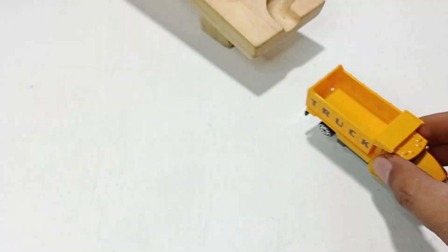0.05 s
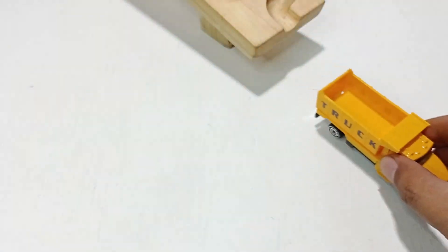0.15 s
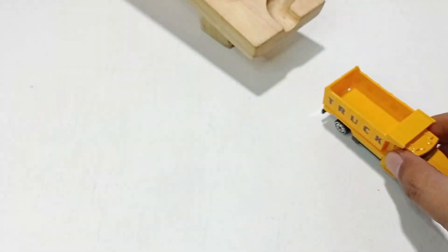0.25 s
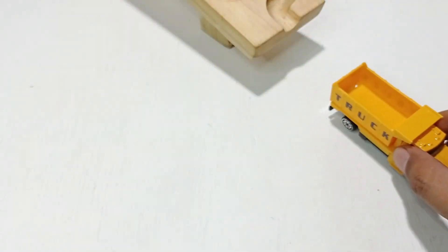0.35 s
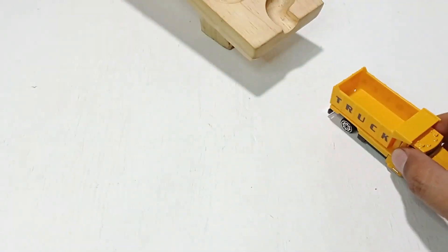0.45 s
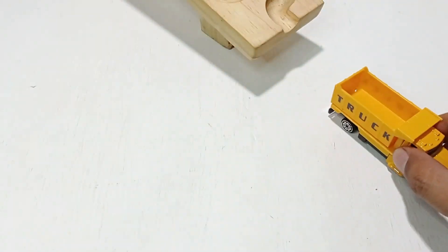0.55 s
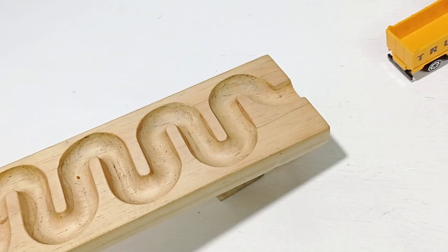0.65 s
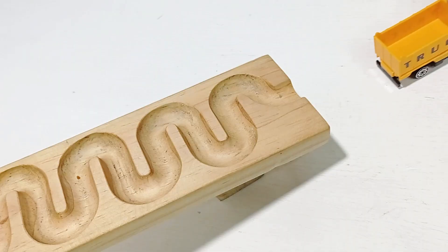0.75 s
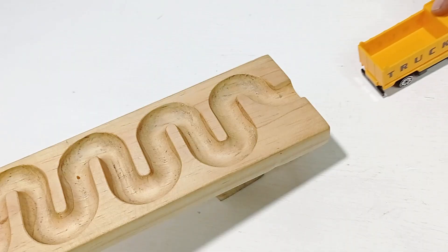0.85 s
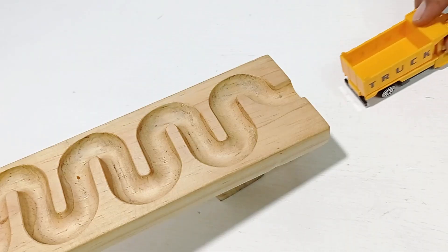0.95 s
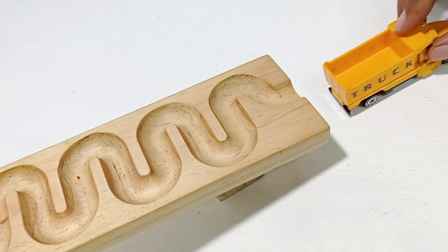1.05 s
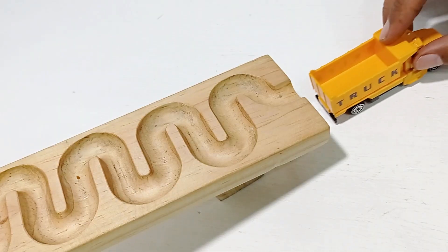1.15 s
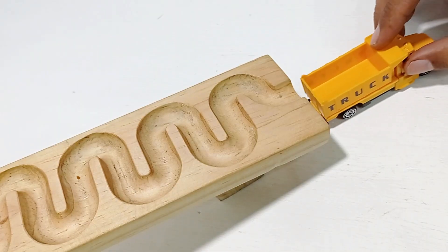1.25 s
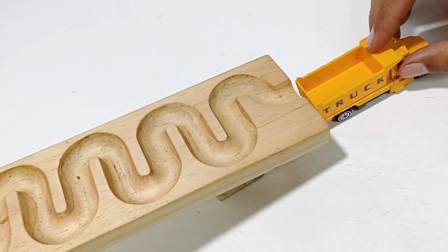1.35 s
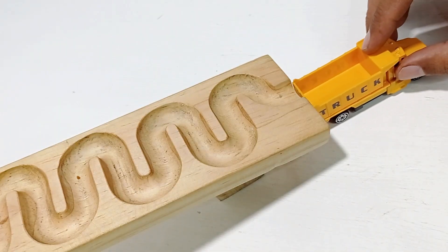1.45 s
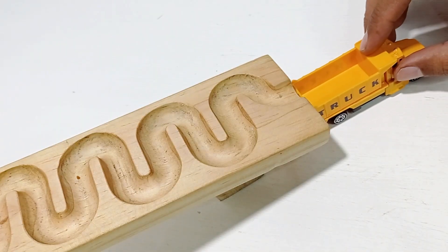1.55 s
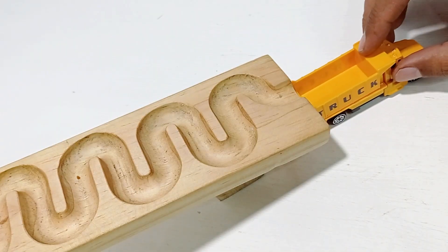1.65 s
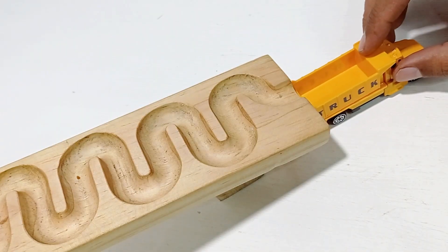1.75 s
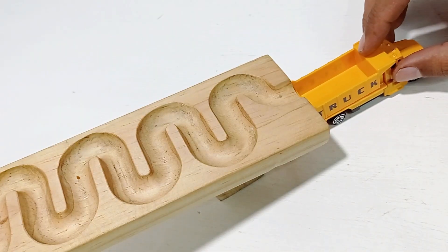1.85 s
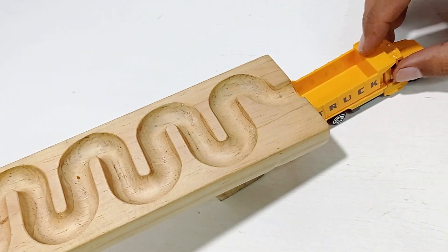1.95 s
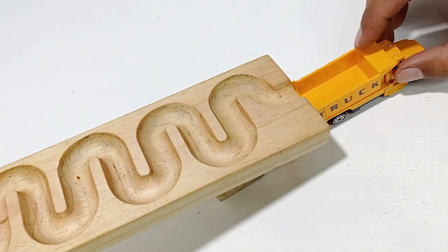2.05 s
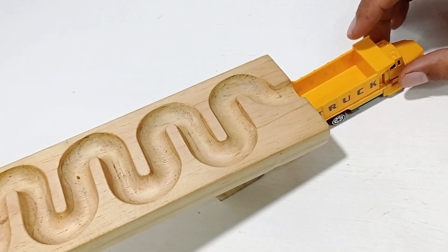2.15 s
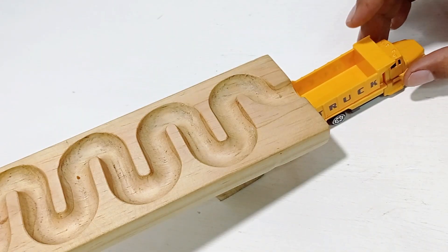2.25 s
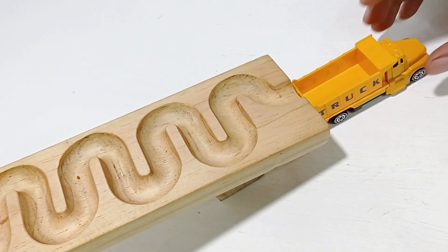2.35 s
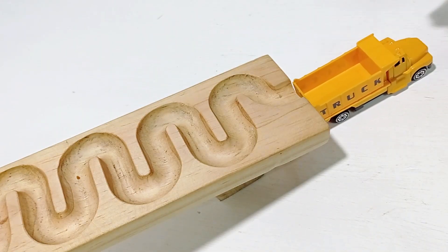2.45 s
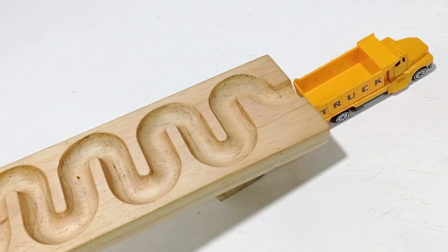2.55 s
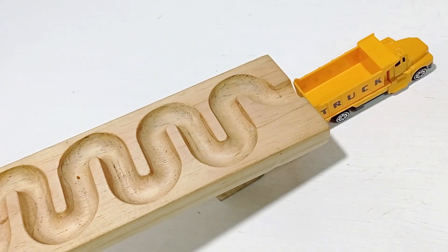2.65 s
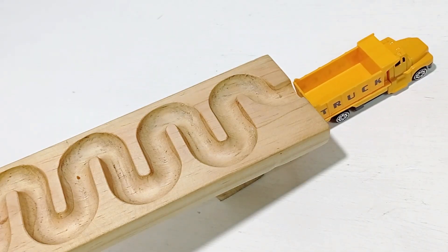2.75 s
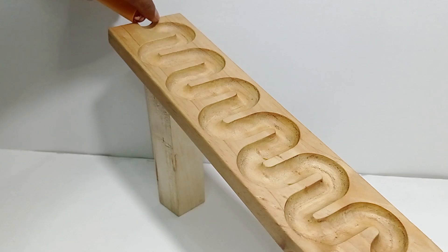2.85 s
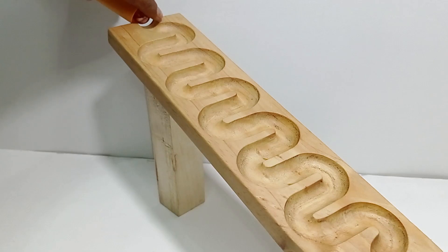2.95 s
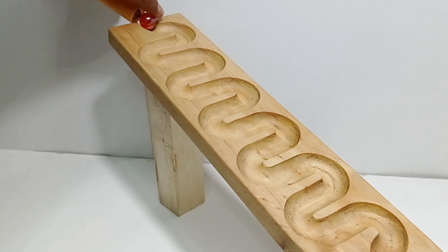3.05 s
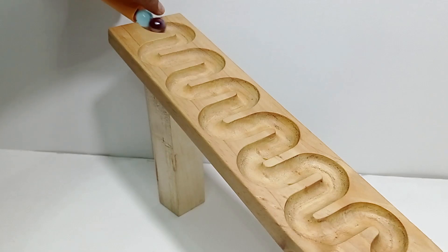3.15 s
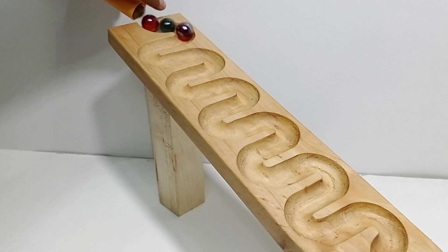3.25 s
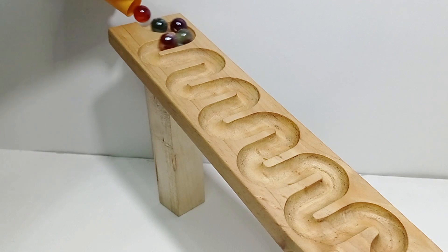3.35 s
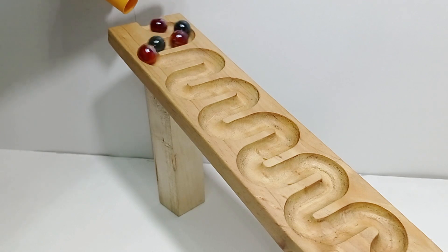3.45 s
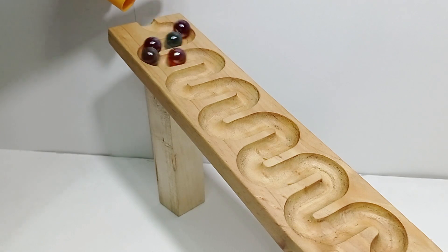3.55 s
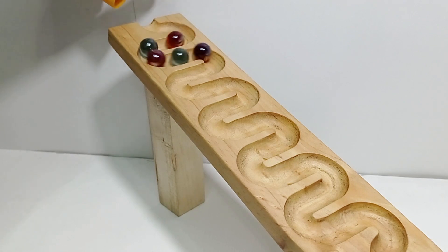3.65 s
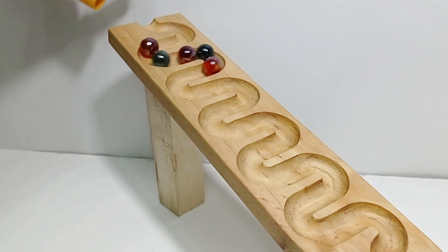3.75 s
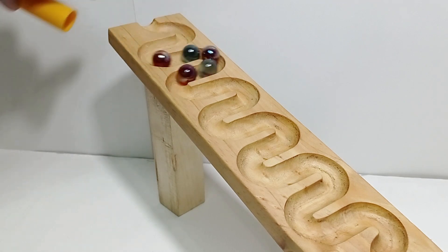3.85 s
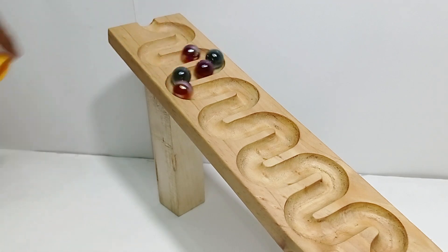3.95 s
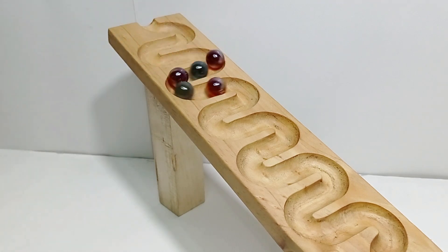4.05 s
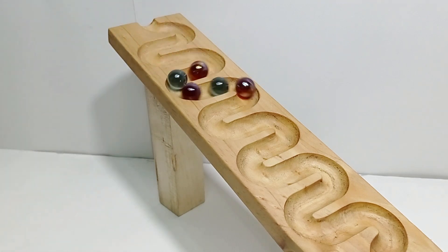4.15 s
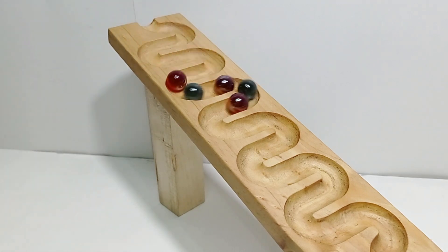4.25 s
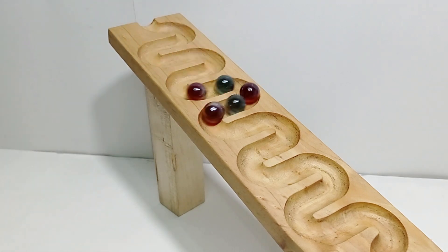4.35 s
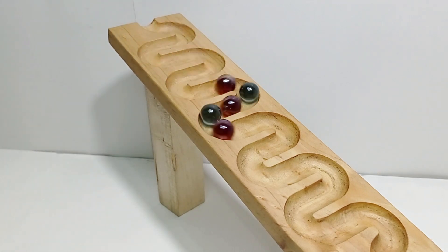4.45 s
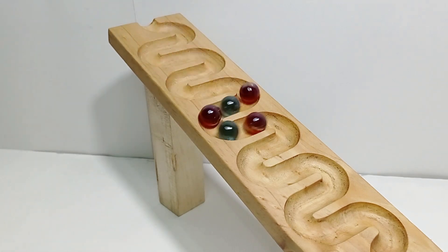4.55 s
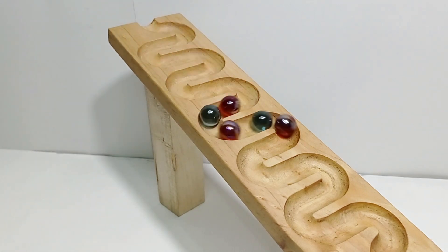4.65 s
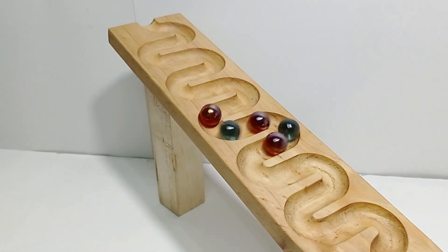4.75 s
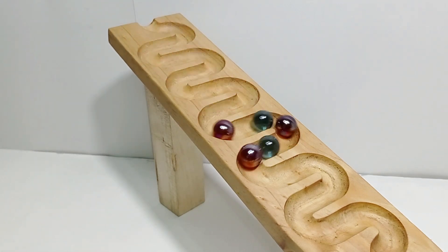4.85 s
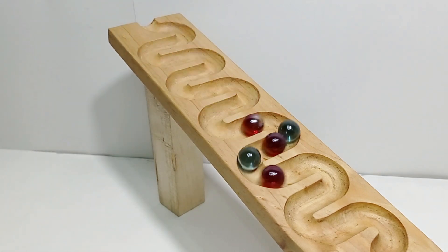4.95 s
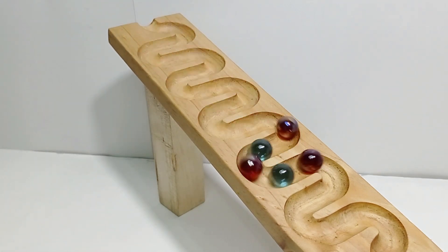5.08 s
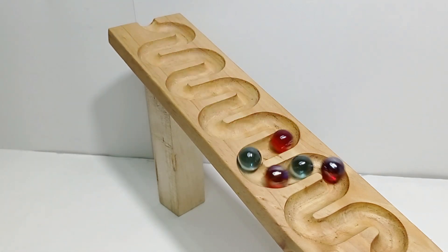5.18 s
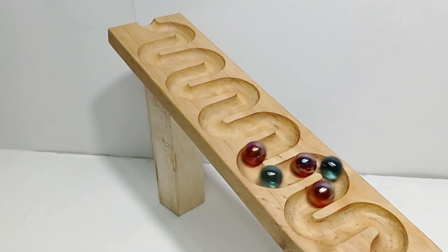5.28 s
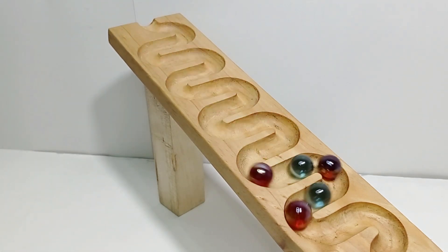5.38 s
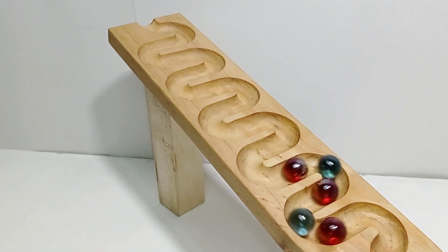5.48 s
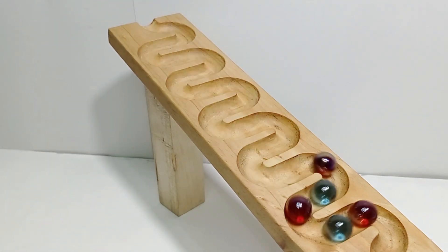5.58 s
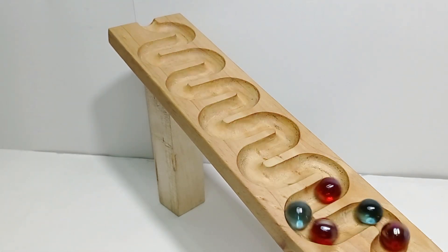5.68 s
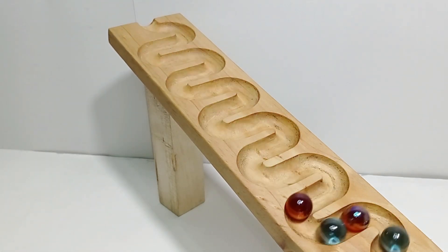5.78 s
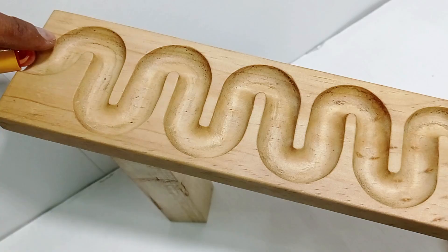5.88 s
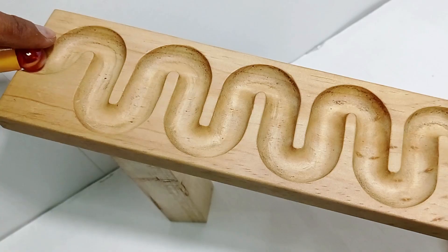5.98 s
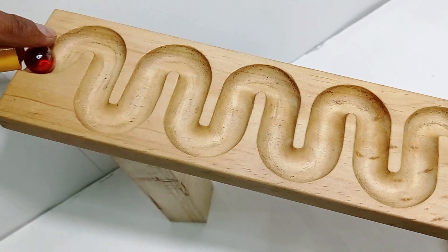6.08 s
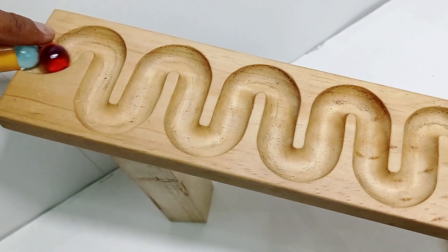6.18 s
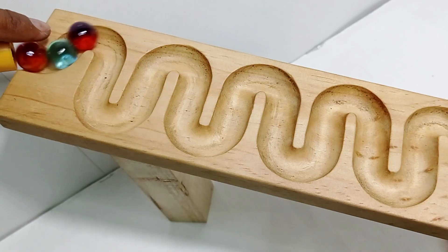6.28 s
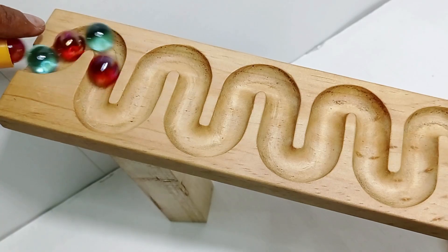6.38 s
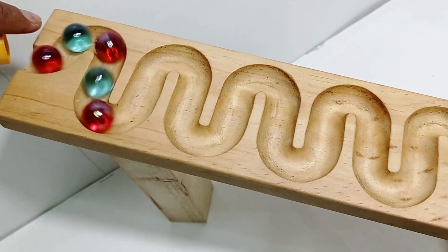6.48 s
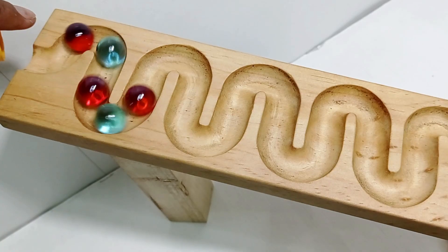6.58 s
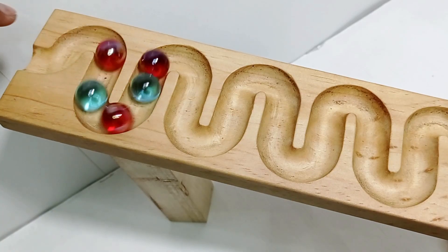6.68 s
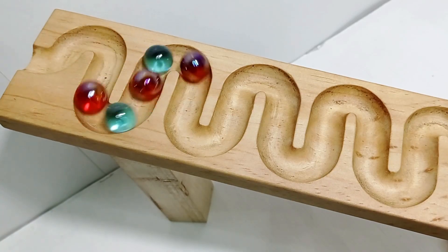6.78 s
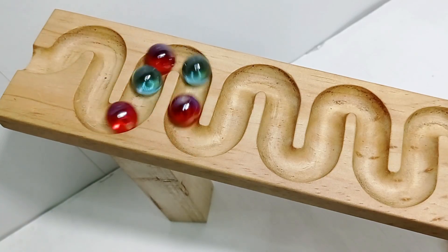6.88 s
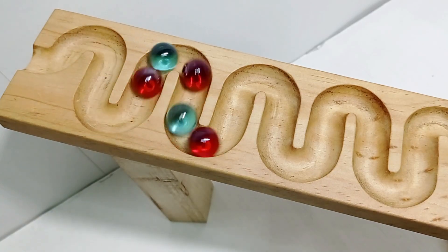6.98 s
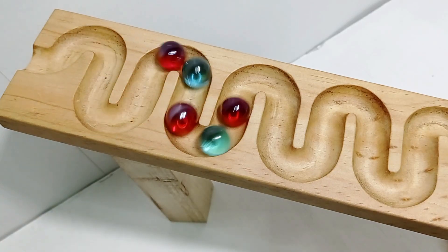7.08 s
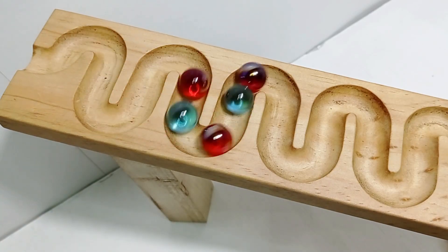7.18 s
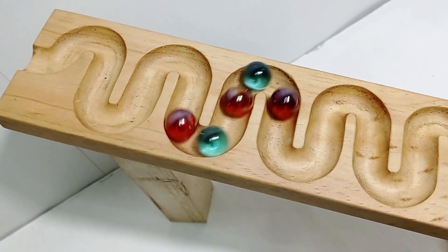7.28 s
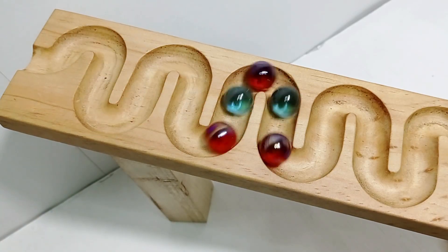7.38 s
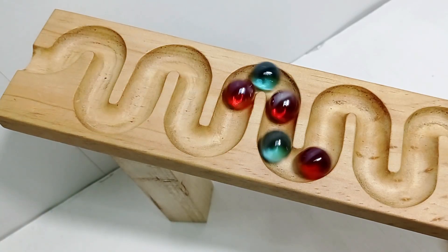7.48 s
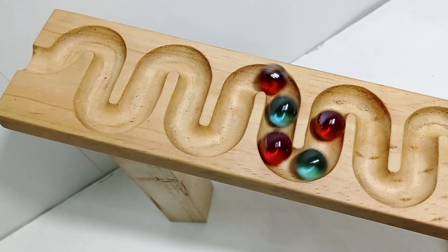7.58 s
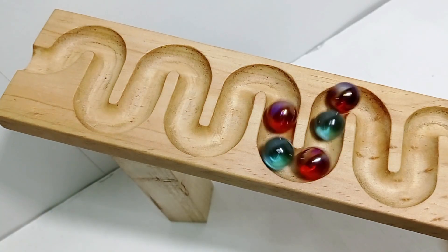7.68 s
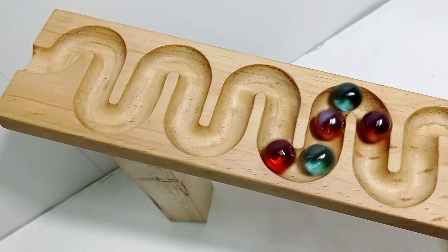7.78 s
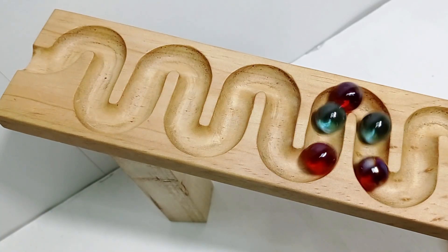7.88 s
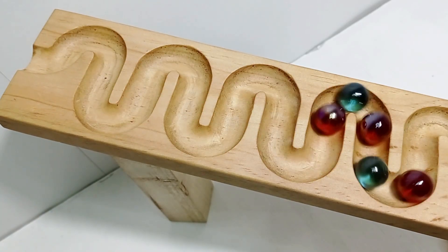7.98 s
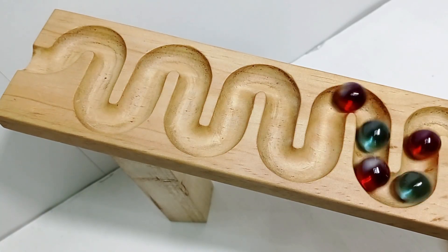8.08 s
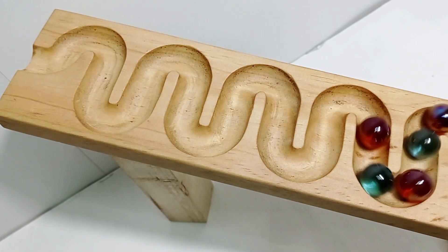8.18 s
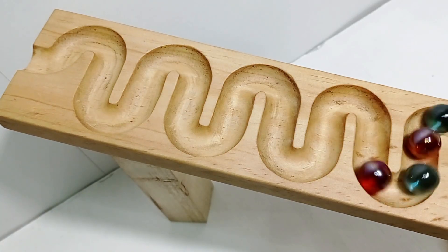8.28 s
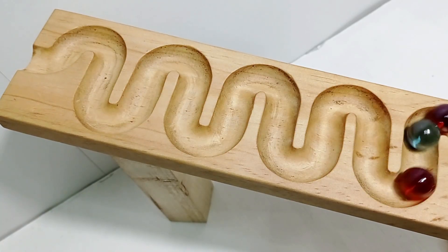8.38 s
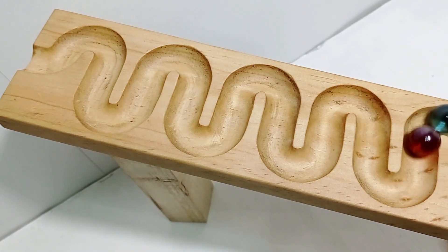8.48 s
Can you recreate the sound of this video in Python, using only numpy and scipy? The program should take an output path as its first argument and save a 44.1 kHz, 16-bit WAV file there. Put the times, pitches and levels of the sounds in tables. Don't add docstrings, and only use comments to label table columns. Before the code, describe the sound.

Quiet room with a plastic toy slap and scrape, then two abruptly cut runs of glass marbles clicking, knocking and rumbling down a wooden zig-zag track.

```python
import sys
import numpy as np
from scipy import signal
from scipy.fft import rfft, irfft
from scipy.io import wavfile

SR = 44100
rng = np.random.default_rng(int(sys.argv[2]) if len(sys.argv) > 2 else 0)


def voltage_ratio(decibels):
    exponent = np.asarray(decibels, float) / 20
    return 10 ** exponent


def unload_audio(sound):
    columns = np.transpose(np.atleast_2d(sound))
    steps = np.round(np.clip(columns, -1, 1) * 32767)
    wavfile.write(sys.argv[1], SR, steps.astype(np.int16))


N = 375732

SCENE_CHANGES_S = [
    .615,
    2.815,
    5.914,
]
AIR_LEVELS_DB = [-67, -68, -58, -61]
# freq_hz, level_db_per_hz
AIR_SPECTRUM = [(15, -32.5), (25, -56), (86, -3.5), (237, -12.5), (291, 3.5), (340, -48.5), (418, -12.5),
                (615, -24), (776, -17), (979, -27), (1340, -21), (1920, -31), (12000, -50), (15600, -84),
                (22000, -120)]
# freq_hz, level_db
HUM_LINES = [(102.3, -68), (193.8, -74), (285.3, -75)]
# freq_hz, level_db_per_hz
SLAP_SPECTRUM = [(500, -6.5), (985, -21), (1500, -13), (4200, 2), (6420, -3), (12000, -29)]
# start_s, peak_db, pitch_hz, sharp_edge_db
TRUCK_TICKS = [(0.4972, -31, 4740, 9), (0.4997, -31.5, 3760, -8), (0.8062, -54, 4100, -15),
               (0.821, -60, 5400, -12), (0.877, -58, 2400, -25), (0.905, -64, 4100, -25),
               (0.989, -55, 6500, -15), (1.171, -65, 4100, -21), (0.846, -59, 5600, -13),
               (0.87, -50, 5800, -7), (0.949, -59, 2240, -11), (0.9827, -51, 5450, -14),
               (1.017, -46, 7100, -13), (1.0675, -53, 7010, -10), (1.1049, -56, 4050, -18),
               (1.1523, -57, 2200, -18), (1.1937, -60.5, 5600, -15), (1.224, -52, 4200, -15),
               (1.3094, -56, 5350, -7), (2.0738, -57, 4540, -10), (2.236, -52, 6600, -17),
               (2.4194, -56.5, 6900, -16)]
# freq_hz, width_hz, level_db
TABLE_MODES = [(101, 10, -19.5), (147, 41, 0.5), (207.2, 9.5, -3.5), (295, 43, 5), (379, 27, -1.5),
               (495, 270, 1)]
# freq_hz, width_hz, level_db
SHELL_MODES = [(2300, 290, 3.3), (3410, 880, 3.6), (4120, 350, 4), (5000, 900, 8.1), (5560, 330, 6.2),
               (7000, 700, 7)]
# peak_s, level_db, rise_db_per_s, fall_db_per_s
TABLE_RUMBLES = [
    (.4965, -29, 3006, 255),
    (1.05, -43.5, 67, 54),
    (2.286, -47.5, 189, 200.5),
    (2.862, -49, 600, 142),
    (3.018, -39, 701, 393),
]
# peak_s, level_db, rise_db_per_s, fall_db_per_s
PLASTIC_RUSTLES = [(.497, -47, 8990, 478), (.95, -65.5, 69, 44), (2.073, -54, 9000, 360),
                   (2.232, -55, 9003, 550), (2.862, -61.5, 150, 327), (3.04, -50.5, 898, 906)]
# freq_hz, t60_s, level_db
ROOM_DECAY = [(203, 1, -5.5), (671, 0.39, 7), (2040, 0.22, 7), (5200, 0.44, -4), (7200, 0.25, -1),
              (11100, 0.15, -8), (16500, 0.11, 5.5)]
# freq_hz, level_db, t60_s
BOARD_MODES = [(118.5, -17.5, 0.68), (160.1, -5, 0.24), (217, 0.5, 0.24), (269.8, -3.5, 0.18),
               (318, -4.5, 0.066), (420.5, -2.5, 0.09), (477, -6, 0.073), (676, 1, 0.026),
               (894, -14.5, 0.027), (1081, 5.5, 0.051), (1337, -4.5, 0.085), (1430, -0.5, 0.041),
               (1780, -15.5, 0.03), (1982, 4, 0.073), (2126, 0.5, 0.027), (2385, 1.5, 0.02),
               (2462, -1, 0.028), (2757, -10.5, 0.028), (3019, -7, 0.052), (3180, -14.5, 0.011),
               (3812, -7.5, 0.039), (4276, -9, 0.028), (5160, -19, 0.0083), (5800, -21.5, 0.019),
               (6600, -24, 0.013), (7370, -32, 0.02), (8800, -35, 0.013)]
# start_s, full_rumble_db, full_rattle_db, full_hiss_db, gather_s
ROLLING_SPELLS = [
    (3.059, -35.5, -46, -61, 0.17),
    (3.241, -25, -27, -54, 0.49),
    (6.01, -51.5, -62, -49, 0.017),
    (6.238, -27.5, -25, -50, 0.029),
]
# rumble_db, rattle_db, hiss_db
REST_DB = (-17.5, -15.5, -7.5)
# rumble_db_per_s, rattle_db_per_s, hiss_db_per_s
SLOPE_DB_PER_S = (-0.5, 2, 5)
# start_s, peak_db, low_modes_db, upper_modes_db, top_modes_db
TUBE_TAPS = [(2.825, -45.5, -17.5, -15.5, -17), (3.214, -30, -0.5, 0, -7), (6.0943, -49, -30, -19, 1),
             (6.111, -32, -4, -31, -11), (6.171, -54, -36, -23, 10), (6.204, -38.5, -17, -7, -15)]
# start_s, peak_db, low_modes_db, upper_modes_db, top_modes_db
BOARD_DROPS = [(3.0696, -6.5, -10.5, -14, -8.5), (3.24, -10.5, -14, -6, -19),
               (3.246, -0.5, -14, -5.5, -12.5), (3.287, -4, -14, -4, -16), (3.3298, -1, -21, -2, -9.5),
               (3.3839, -1, -18.5, -3, -11.5), (3.4142, -9, -7.5, 1.5, -12),
               (3.4543, -1, -17.5, -4.5, -14.5), (6.012, -35.5, -5, -27, -1), (6.248, -9, -12, -13, -14),
               (6.2772, -12.5, -12, -25, -18), (6.3404, -3, -12, -38, -20), (6.3517, -3.5, -16.5, -19, -11),
               (6.414, 3, -23, -14.5, -15), (6.4818, -4, -10.5, -6, -12), (6.5063, -3.5, -38, -11, -24.5),
               (6.518, -2, -15, -4, -5.5)]
# start_s, peak_db,
# top_modes_db
EXTRA_TOUCHES = [(3.4015, -12, -16), (3.4833, -17, -13), (3.801, -18.5, -29), (4.3312, -16, -25),
                 (4.591, -5, -27.5), (6.3676, -6.5, -21), (6.539, -8, -22), (6.5515, -12, -5),
                 (6.5582, -16, -22), (6.9505, -18, -16), (7.0415, -24, -16), (7.5181, -9.5, -14),
                 (7.5271, -9, -10.5), (7.8054, -10, -17.5), (7.817, -14, -20), (7.8825, -14, -22),
                 (7.9014, -15, -25), (8.0707, -15, -12.5), (8.147, -18, -9), (8.2524, -20, -16),
                 (8.488, -15, -14), (3.0641, -14.5, -22), (3.3248, -21, -26), (3.3442, -14, -20),
                 (3.3555, -9, -22), (3.427, -16, -20)]
# start_s, peak_db, top_modes_db
HIGH_KNOCKS = [(3.531, -19.5, -26), (3.554, -16.5, -30), (3.603, -15.5, -20.5), (3.6723, -22, -25),
               (3.7137, -16.5, -23), (3.7898, -18.5, -28), (3.8091, -17, -18), (3.836, -24, -25),
               (3.852, -14, -28), (3.887, -22, -27), (3.9756, -18.5, -43), (4.0023, -15.5, -32),
               (4.076, -12, -12.5), (4.1586, -17, -29), (4.2046, -13, -46), (4.2797, -12.5, -19),
               (4.295, -9.5, -33), (4.313, -22, -12), (4.36, -17.5, -28), (4.3787, -12.5, -23),
               (4.4666, -16.5, -23), (4.507, -12.5, -25), (4.577, -11, -24), (4.6083, -9.5, -37),
               (4.6995, -11, -39), (4.7127, -9.5, -40)]
# start_s, peak_db, top_modes_db
LOW_KNOCKS = [(4.787, -11, -28), (4.81, -7, -24), (4.906, -8.5, -22), (4.9223, -11, -22),
              (4.9915, -8, -22.5), (5.0118, -10, -23), (5.0344, -15.5, -21), (5.095, -18, -12),
              (5.142, -15, -29), (5.1885, -15.5, -20), (5.214, -13, -20.5), (5.2745, -22, -23),
              (5.3154, -22, -21), (5.328, -13, -19), (5.369, -27, -19), (5.3927, -16.5, -24),
              (5.447, -18, -21), (5.471, -8.5, -12.5), (5.51, -21, -17), (5.5284, -11, -21.5),
              (5.553, -11.5, -20.5), (5.5922, -13, -10), (5.681, -11, -15), (5.769, -11.5, -21),
              (5.8112, -11, -16), (5.8898, -13.5, -29)]
# start_s, peak_db, top_modes_db
NEAR_KNOCKS = [(6.6366, -12, -14), (6.716, -11.5, -8.5), (6.7755, -13, -13.5), (6.827, -19.5, -23),
               (6.928, -14, -31), (6.9637, -12, -9.5), (7.1297, -19, -13.5), (7.144, -10, -25),
               (7.252, -8.5, -19), (7.3138, -8, -33), (7.4348, -12, -24), (7.4831, -13.5, -21.5),
               (7.506, -7.5, -15.5), (7.5467, -10, -19), (7.598, -31, -19), (7.6135, -11.5, -21),
               (7.6345, -11, -25.5), (7.6951, -16, -18), (7.7593, -11.5, -23), (7.796, -7.5, -15.5),
               (7.8482, -10, -10.5), (7.8882, -7.5, -15), (7.989, -18, -18), (8.1549, -15.5, -11.5),
               (8.2815, -12.5, -21), (8.3339, -22, -11), (8.4513, -13.5, -23)]
# start_s, peak_db, top_modes_db
HIGH_LIGHT = [(3.491, -20, -10), (3.6215, -15, -31), (3.6922, -26.5, -8), (3.7414, -16, -21),
              (3.807, -33, -17), (3.8162, -20, -16), (3.8624, -17, -29), (3.8725, -15, -27),
              (3.8985, -15.5, -12), (3.9127, -18, -36), (3.9186, -13, -33), (4.0209, -18, -33),
              (4.0913, -9, -36), (4.1126, -16.5, -23), (4.1911, -15, -27), (4.2214, -12, -29),
              (4.2454, -14, -36), (4.3978, -12.5, -24), (4.4174, -16, -20.5), (4.4459, -16, -25),
              (4.4797, -12, -29), (4.6563, -18, -29), (4.6814, -21.5, -25), (4.7387, -10.5, -26)]
# start_s, peak_db, top_modes_db
LOW_LIGHT = [(4.878, -19.5, -22), (5.1044, -31, -28), (5.117, -25, -32), (5.151, -23, -28),
             (5.1615, -11.5, -23), (5.243, -18, -10.5), (5.2884, -16, -16), (5.3366, -19.5, -6),
             (5.4083, -14, -18), (5.4277, -22, -10), (5.5348, -10.5, -7), (5.5607, -21, -19),
             (5.5613, -7, -22), (5.6191, -11, -11), (5.6461, -18, -17), (5.6569, -12.5, -15),
             (5.667, -11.5, -15), (5.705, -20, -18), (5.7394, -15, -23), (5.7453, -9, -16),
             (5.7614, -16, -13.5), (5.7696, -12.5, -25), (5.7944, -15, -14), (5.8391, -8.5, -12),
             (5.8495, -14.5, -10), (5.867, -20, -7)]
# start_s, peak_db, top_modes_db
NEAR_LIGHT = [(6.6104, -33.5, -7), (6.6479, -18, -18), (6.6662, -14, -14), (6.7396, -17.5, -16),
              (6.7965, -12, -28), (6.8781, -18, -21), (6.9788, -12, -23), (6.9858, -12, -23),
              (7.0244, -13.5, -19), (7.0377, -15, -21), (7.0835, -18, -26), (7.212, -24, -29),
              (7.2264, -17.5, -17), (7.2701, -8, -36), (7.2851, -20.5, -16), (7.3488, -18, -25.5),
              (7.3796, -30, -31), (7.3962, -22, -28), (7.5641, -11.5, -22), (7.7077, -7.5, -21),
              (7.7725, -15, -18), (7.8636, -6.5, -13.5), (8.0052, -19, -17), (8.0315, -20, -25),
              (8.0504, -12.5, -15), (8.1339, -15, -11), (8.1742, -10, -21), (8.206, -18, -30),
              (8.235, -13, -14), (8.3589, -12.5, -20), (8.4147, -20, -19), (8.4793, -13.5, -17)]
# high_db, low_db, near_db
KNOCK_UPPER_DB = (-5.5, -3.5, -9.5)
# start_s, peak_db, pitch_hz, sharp_edge_db
GLASS_CLICKS = [(3.057, -29, 5200, -39), (3.0703, -6, 6050, -41.5), (3.0897, -4.5, 6240, -39),
                (3.2155, -31, 8760, -44), (3.0723, -2, 5850, -39.5), (3.247, -0.5, 5400, -39),
                (3.251, -4, 6600, -33), (3.3297, -18, 7040, -25), (3.34, -7, 5400, -29),
                (3.351, -14, 7050, -26), (3.371, -11, 5950, -22), (3.3926, -12, 6600, -39),
                (3.4054, -19, 7200, -21), (3.525, -25.5, 6600, -56), (3.689, -19.5, 6500, -38),
                (3.8482, -23.5, 7100, -41), (3.953, -30, 7440, -43), (3.9983, -13.5, 6640, -37),
                (4.1117, -17, 6530, -39), (4.1871, -16.5, 6370, -44), (4.5078, -19, 6400, -49),
                (4.5886, -12, 6600, -43), (4.6776, -9, 6740, -39), (4.777, -8, 6600, -37),
                (4.9605, -13.5, 6970, -41), (4.967, -21, 6600, -38), (3.2085, -25, 6780, -50),
                (5.167, -8.5, 6900, -49), (5.3326, -9.5, 6860, -41.5),
                (6.011, -28.5, 5800, -54), (6.109, -31.5, 6040, -45), (6.1877, -37, 7000, -55),
                     (6.226, -34, 7500, -40.5), (6.2471, -0.5, 6380, -44), (6.339, -7, 6600, -51.5),
                     (6.3439, -0.5, 6540, -35), (6.3501, -7, 7000, -47.5), (6.362, -12, 6600, -43),
                     (6.398, -20, 8150, -32), (6.417, -5, 6550, -34), (6.477, -16.5, 8150, -39),
                     (6.4982, -10, 6500, -37), (6.754, -18.5, 7180, -38), (6.8843, -10.5, 7230, -36),
                     (6.96, -12, 7200, -46), (7.281, -11.5, 6750, -26.5), (8.4754, -13, 6700, -32)]
# freq_hz, level_db, t60_s
TUBE_MODES = [(438, 2, 0.089), (1082, -8, 0.11), (1700, -8, 0.072), (2350, -16, .05), (3340, -10, .05),
              (4170, -2.5, .05)]
# start_s, peak_db
TUBE_NUDGES = [(6.011, -38.5), (6.094, -52), (6.112, -39), (6.17, -55), (6.2018, -46), (6.222, -51)]

EDGE_HZ = 15300
NEAR_S = SCENE_CHANGES_S[-1]


def rms_one(x):
    return x / np.sqrt(np.mean(x ** 2) + 1e-20)


def parts(x):
    return np.split(x, (np.array(SCENE_CHANGES_S) * SR).astype(int))


def at_hz(hz_points, values, hz):
    return np.interp(np.log(hz), np.log(hz_points), values)


def cut(x, kind, hz, order):
    sos = signal.butter(order, hz, kind, fs=SR, output="sos")
    return np.concatenate([signal.sosfilt(sos, p) for p in parts(x)])


def band_pass(x, low_hz, high_hz):
    return signal.sosfilt(signal.butter(2, [low_hz, high_hz], "band", fs=SR, output="sos"), x)


def shaped_noise(length, spectrum):
    hz = np.maximum(np.fft.rfftfreq(length, 1 / SR), 1)
    gain = voltage_ratio(at_hz(*np.transpose(spectrum), hz))
    return rms_one(irfft(rfft(rng.standard_normal(length)) * gain, length))


def ring(clicks, hz, t60_s, near=1.0):
    w = 2 * np.pi * hz / SR
    pieces = parts(clicks)
    t60s = [t60_s] * (len(pieces) - 1) + [t60_s * near]
    out = []
    for piece, decay_s in zip(pieces, t60s):
        r = voltage_ratio(-60 / (decay_s * SR))
        out.append(signal.lfilter([0, np.sin(w)], [1, -2 * r * np.cos(w), r * r], piece + 1e-18))
    return np.concatenate(out)


def train(seconds, heights):
    out = np.zeros(N)
    np.add.at(out, (np.asarray(seconds) * SR).astype(int), heights)
    return out


def grit(per_s, spread_db):
    sizes = voltage_ratio(spread_db * np.minimum(rng.exponential(1, N), 4)) * rng.choice([-1, 1], N)
    return rms_one(sizes * (rng.random(N) < per_s / SR))


def burst(hz, t60_s, peak_db):
    t = np.arange(int(t60_s * SR) + 8) / SR
    swell = np.sin(np.pi / 2 * np.minimum(t * hz, 1)) ** 2
    return voltage_ratio(peak_db - 60 * t / t60_s) * np.sin(2 * np.pi * hz * t) * swell


def add(out, s, sound):
    i = int(s * SR)
    out[i:i + len(sound)] += sound[:N - i]


def drift(per_s):
    steps = rng.standard_normal(int(N / SR * per_s) + 2)
    return np.interp(np.arange(N) / SR * per_s, np.arange(len(steps)), steps)


def swells(rows):
    t = np.arange(N) / SR
    part = np.searchsorted(SCENE_CHANGES_S, t)
    total = np.zeros(N)
    for s, db, rise, fall in rows:
        below_db = np.where(t < s, rise * (s - t), fall * (t - s))
        total += voltage_ratio(db - below_db) * (part == np.searchsorted(SCENE_CHANGES_S, s))
    return total


def air():
    both = shaped_noise(N, AIR_SPECTRUM)
    white = rng.standard_normal(N)
    for hz, db in HUM_LINES:
        steady = np.sin(2 * np.pi * hz * np.arange(N) / SR)
        unsteady = rms_one(ring(white, hz, 0.48))
        both += voltage_ratio(db + 68.5) * rms_one(steady + 0.38 * unsteady)
    return np.concatenate([voltage_ratio(db) * p for db, p in zip(AIR_LEVELS_DB, parts(both))])


def slap():
    level_db, t60_s, rise_s = -30, 0.081, 0.0027
    t = np.arange(SR // 8) / SR
    noise = shaped_noise(len(t), SLAP_SPECTRUM)
    return noise * voltage_ratio(level_db - 60 * t / t60_s) * np.minimum(t / rise_s, 1)


def table_top():
    low = grit(1100, 6.3)
    modes = np.zeros(N)
    for k, (hz, width_hz, db) in enumerate(TABLE_MODES):
        modes += voltage_ratio(db) * ring(low, hz, 2.94 / width_hz) * (-1) ** k
    table = swells(TABLE_RUMBLES) * rms_one(modes)
    thump = 2 * cut(table, "low", 230, order=4)
    table = np.where(np.arange(N) > SCENE_CHANGES_S[1] * SR, thump, table)
    return cut(cut(table, "high", 81, order=2), "low", 1500, order=4)


def truck_shell():
    rustle = voltage_ratio(-21.5) * swells(PLASTIC_RUSTLES) * grit(4000, 5.2)
    s, peak_db, tick_hz, sharp_db = np.transpose(TRUCK_TICKS)
    luck = rng.standard_normal((len(s), len(SHELL_MODES)))
    shell = np.zeros(N)
    for k, (hz, width_hz, db) in enumerate(SHELL_MODES):
        favour_db = -22.0 * np.abs(np.log2(hz / tick_hz)) + 2.7 * luck[:, k]
        ticks = train(s, voltage_ratio(peak_db + favour_db + 3.0))
        mode = ring(ticks + rustle, hz, np.log(1000) / np.pi / width_hz * 1.15)
        shell += voltage_ratio(db) * band_pass(mode, hz / 1.4, hz * 1.46)
    for at, db in zip(s, peak_db + sharp_db):
        add(shell, at, burst(7100, 0.009, db - 10.5))
    shell = cut(shell, "low", 8200, order=4)
    add(shell, s[0], burst(EDGE_HZ, .002, peak_db[0] - 9))
    for hz, db in [(1400, -6.0), (2600, -1.5), (10500, -16.5)]:
        add(shell, s[0], burst(hz, 0.0061, peak_db[0] + db))
    add(shell, s[0] - .003, slap()[:int((SCENE_CHANGES_S[0] - s[0]) * SR)])
    return shell


def room(x):
    t = np.arange(SR // 2) / SR
    echo = np.zeros(len(t))
    hz_points, t60s, levels_db = np.transpose(ROOM_DECAY)
    edges = np.geomspace(80, 16500, num=17)
    for low, high in zip(edges, edges[1:]):
        hz = np.sqrt(low * high)
        band = band_pass(rng.standard_normal(len(t)), low, high)
        echo += band * voltage_ratio(at_hz(hz_points, levels_db, hz) - 60 * t / at_hz(hz_points, t60s, hz))
    echo *= np.clip(t / 0.00035 - .5, 0, 1) / np.sqrt(len(t)) * voltage_ratio(6.5)
    return np.concatenate([signal.fftconvolve(p, echo)[:len(p)] for p in parts(x)])


def rolling_gains():
    over_leg_db, leave_leg_s = -9.5, 0.4
    t = np.arange(N) / SR
    spells = np.array(ROLLING_SPELLS)
    current = np.maximum(np.searchsorted(spells[:, 0], t) - 1, 0)
    start, *full_db, gather_s = spells[current].T
    age = np.maximum(t - start, 0)
    on = (t > start) & ~((t > NEAR_S) & (start < NEAR_S))
    gains = []
    for db, rest, creep in zip(full_db, REST_DB, SLOPE_DB_PER_S):
        gains.append(on * voltage_ratio(db + rest * np.exp(-age / gather_s) + creep * (age - 1.5)))
    return gains, voltage_ratio(over_leg_db * np.exp(-age / leave_leg_s))


def blows():
    knock_db, knock_top_db, rebound_db, touch_upper_db = 4.5, 1, -3.5, -7

    def low_db(db):
        return -16 - 0.3 * db

    rows = BOARD_DROPS + TUBE_TAPS
    stretches = zip((HIGH_KNOCKS, LOW_KNOCKS, NEAR_KNOCKS), (HIGH_LIGHT, LOW_LIGHT, NEAR_LIGHT), KNOCK_UPPER_DB)
    for knocks, light, upper_db in stretches:
        for s, db, top in knocks + [(s, db + rebound_db, top) for s, db, top in light]:
            db = db + knock_db
            rows = rows + [(s, db, low_db(db), upper_db, top + knock_top_db)]
    rows = rows + [(s, db, low_db(db), touch_upper_db, top) for s, db, top in EXTRA_TOUCHES]
    return np.transpose(rows)


def board():
    top_modes_hz = 5000
    leg_edges_hz, leg_share = (200, 350, 500, 900), (0, 1, -.5, .5, 0)
    (rumble, rattle, hiss), span = rolling_gains()
    held = [span ** share for share in leg_share]
    s, peak_db, low_db, upper_db, top_db = blows()
    luck = rng.standard_normal((len(s), len(BOARD_MODES) + 5))
    glancing = np.clip(-peak_db / 4.04, .1, 1)
    skids_s = s[:, None] + np.cumsum(.0028 * voltage_ratio(3.0 * luck[:, :3]), axis=1)
    grits = [grit(1500, 5.5), grit(1000, 5.8), grit(1000, 6.4)]
    bumps = grit(60, 2.83)
    near = (np.arange(N) > NEAR_S * SR).astype(int)
    late_db = 2.5 * np.maximum(np.arange(N) / SR - 6.8, 0)
    closeness = [voltage_ratio(0.5 * near), voltage_ratio(-1.5 * near), voltage_ratio(late_db), 1, voltage_ratio(np.take((-2.5, 0.5), near))]
    mid_db = -10.0 - 1.8 * (s > NEAR_S)
    weights_db = [low_db - 0.5, mid_db, upper_db + 2.5, top_db + 12.5]
    out = np.zeros(N)
    for k, (hz, level_db, t60_s) in enumerate(BOARD_MODES):
        family = np.searchsorted([1500, 2280, 3300], hz)
        blow = voltage_ratio(peak_db + weights_db[family] + 2.3 * luck[:, k])
        knocks = train(s, blow * np.sign(luck[:, k + 1]) * (1 - 0.43 * glancing))
        skids = 0.24 * (blow * glancing)[:, None] * luck[:, k + 2:k + 5]
        knocks += train(skids_s.ravel(), skids.ravel())
        if hz < 700:
            speed, wander_db, grain, marks = voltage_ratio(-24.0) * rumble, 1.5, .8, 0
        elif hz < top_modes_hz:
            speed, wander_db, grain, marks = voltage_ratio(-27.0) * rattle, 1.8, .4, .35
        else:
            speed, wander_db, grain, marks = voltage_ratio(4.5) * hiss, 1.8, .4, .8
        wander = voltage_ratio(wander_db * drift(9))
        rolling = speed * wander * (grain * grits[k % 3] + marks * bumps)
        drive = knocks + rolling * closeness[np.searchsorted([200, 250, 700, 2200], hz)]
        drive = drive * held[np.searchsorted(leg_edges_hz, hz)]
        mode = ring(drive, hz, t60_s * 0.92, 0.65 if hz > 700 else 1.0)
        out += voltage_ratio(level_db) * cut(mode, "low", 0.84 * hz + 150, order=2)
    dent_db = peak_db - 4.0 - 8.1 * glancing + 4 * (s > NEAR_S)
    for at, db, hz in zip(s, dent_db, 2300 * voltage_ratio(1.94 * luck[:, 0])):
        add(out, at, burst(hz, 0.011, db))
    bare = rattle * voltage_ratio(np.take((-14, -5.5), near)) * (grits[1] + 1.05 * bumps)
    out += 1.35 * cut(cut(bare, "low", 2460, order=6), "high", 1100, order=2)
    return cut(cut(out, "low", 7330, order=4), "high", 145, order=2)


def marbles():
    echo_span_s, echo_db, echo_loss_db_per_s = .009, -6, 803
    out = np.zeros(N)
    for s, db, hz, edge_db in GLASS_CLICKS:
        click = burst(hz, 0.0027, db + 1.5)
        add(out, s, click)
        add(out, s, burst(EDGE_HZ, .003, db + edge_db + 6.5))
        for lag_s in rng.uniform(.06, 1, 6) * echo_span_s:
            add(out, s + lag_s, click * voltage_ratio(echo_db - echo_loss_db_per_s * lag_s))
    return cut(out, "high", 1700, order=2)


def tube():
    s, db = np.transpose(TUBE_NUDGES)
    t = np.arange(N) / SR
    slide = voltage_ratio(-80.5) * grit(2000, 3.6) * ((t > s[0]) & (t < ROLLING_SPELLS[-1][0]))
    luck = rng.standard_normal((len(s), len(TUBE_MODES)))
    rings = np.zeros(N)
    for k, (hz, level_db, t60_s) in enumerate(TUBE_MODES):
        nudges = train(s, voltage_ratio(db + 2.1 * luck[:, k]))
        rings += voltage_ratio(level_db) * ring(nudges + slide, hz, t60_s)
    return cut(rings, "low", 5200, order=4)


def scene():
    table, shell = table_top(), truck_shell()
    wood, glass = board() + tube(), marbles()
    wet = room(voltage_ratio(-5) * wood + voltage_ratio(3.5) * glass + voltage_ratio(1.5) * shell)
    *earlier, last = parts(wet)
    fades = [np.minimum(np.arange(len(p))[::-1] / (.002 * SR), 1) for p in earlier]
    fades = np.concatenate(fades + [np.ones_like(last)])
    beamed = cut(glass, "low", 9500, order=2)
    return ((wood + beamed + table + shell + wet) * fades + air())[None]


def band_limit(x):
    return signal.sosfilt(signal.butter(12, 16820, fs=SR, output="sos"), x)


def record(dry):
    port_db, ceiling, band_top_hz = 4, 1.15, 16500
    x = cut(dry[0], "high", 40, order=2)
    port = signal.sosfilt(signal.butter(1, [14300, 16200], "band", fs=SR, output="sos"), x)
    x = 0.87 * (x + voltage_ratio(port_db) * port)
    x = x / (1 + (x / ceiling) ** 4) ** 0.25
    x = cut(x, "low", band_top_hz, order=8)
    return band_limit(x[None])


dry = scene()
out = record(dry)
unload_audio(out)
```